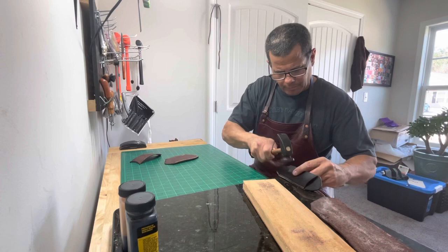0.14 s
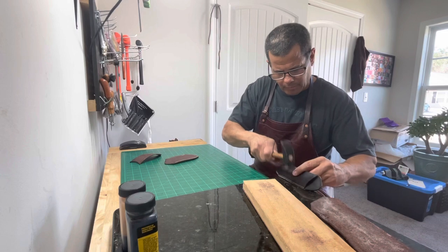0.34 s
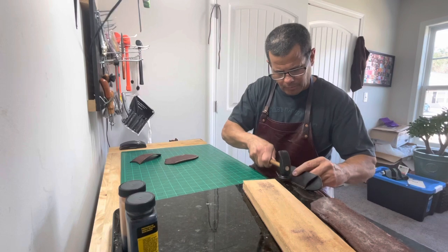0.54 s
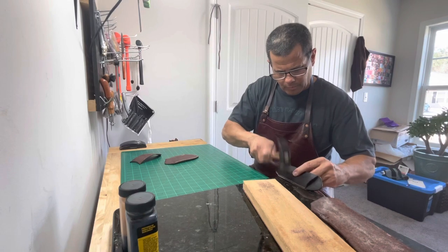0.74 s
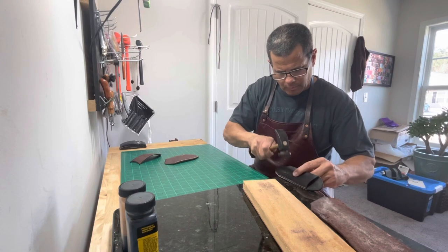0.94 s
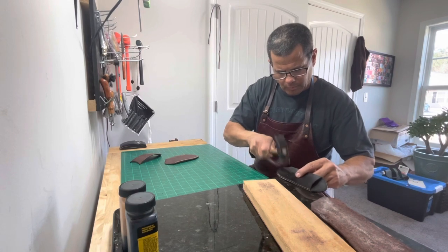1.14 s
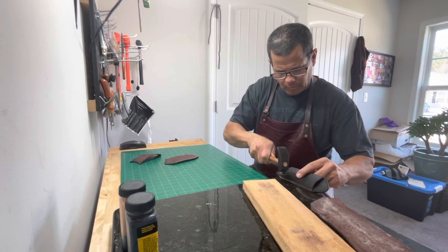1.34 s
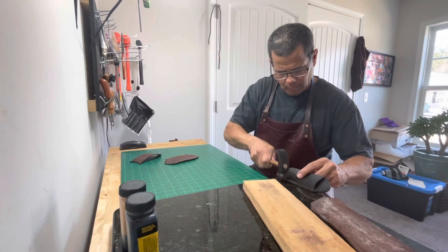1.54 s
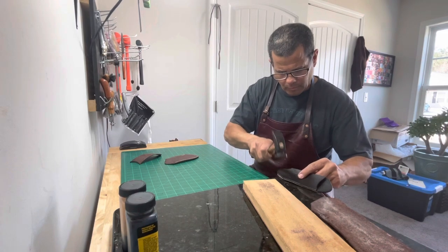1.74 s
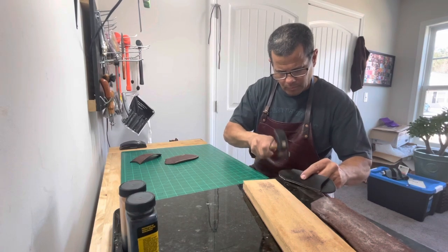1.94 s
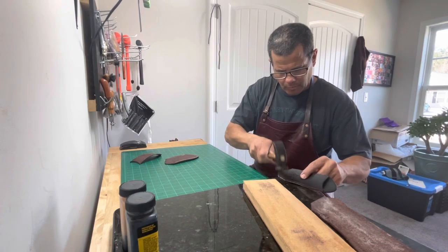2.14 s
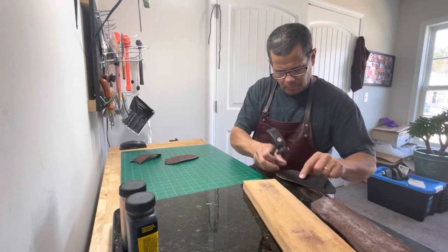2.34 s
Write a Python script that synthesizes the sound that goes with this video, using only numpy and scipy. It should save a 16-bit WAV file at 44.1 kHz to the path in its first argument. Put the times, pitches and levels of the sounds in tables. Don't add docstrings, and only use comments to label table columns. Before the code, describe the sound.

Steady hammer blows on leather over a stone slab, hard woody knocks with short room echo

```python
import sys
import numpy as np
from scipy import signal
from scipy.fft import rfft, irfft
from scipy.io import wavfile
from scipy.ndimage import uniform_filter1d, minimum_filter1d

SR = 44100
rng = np.random.default_rng(int(sys.argv[2]) if len(sys.argv) > 2 else 0)


def inscribe(sig):
    pcm = np.round(np.clip(np.atleast_2d(sig).T, -1, 1) * 32767)
    wavfile.write(sys.argv[1], SR, pcm.astype(np.int16))


def ratio(d):
    e = np.asarray(d, float) / 20
    return 10 ** e


N = 105840


def rms_one(x):
    return x / np.sqrt(np.mean(x ** 2) + 1e-20)


def at_hz(points, hz):
    p = np.array(points)
    return np.interp(np.log(np.maximum(hz, 1)), np.log(p[:, 0]), p[:, 1])


def train(s, gain):
    x = np.zeros(N)
    np.add.at(x, np.clip((np.asarray(s) * SR).astype(int), 0, N - 1), gain)
    return x


def ring(clicks, hz, t60):
    r, w = ratio(-60 / (max(t60, .003) * SR)), 2 * np.pi * hz / SR
    return signal.lfilter([0, np.sin(w)], [1, -2 * r * np.cos(w), r * r], clicks + 1e-18)


def coloured(white, spectrum):
    size = white.shape[-1]
    gain = ratio(at_hz(spectrum, np.arange(size // 2 + 1) * SR / size))
    return rms_one(irfft(rfft(white) * gain, size))


def band(x, low_high_hz):
    return signal.sosfilt(signal.butter(2, low_high_hz, "band", fs=SR, output="sos"), x)


# t/s, peak level/dB, crack level/dB, lead-in level/dB, echo brightness/dB
BLOWS = [
    (0.212, -7.5, -27.5, -23.5, -5),
    (0.493, -8, -24, -18, -4),
    (0.766, -8, -26, -13.5, -3.5),
    (1.026, -8, -26.5, -15, -4),
    (1.29, -7.5, -25, -26.5, 0),
    (1.538, -8.5, -27, -16, -3.5),
    (1.795, -8.5, -27, -16, 1),
    (2.051, -8, -29.5, -13.5, -0.5),
]
# f/Hz, left level/dB, right level/dB, t60/s, start lag/s
BENCH_MODES = [(112.2, -30.5, -37, 0.33, 0.0301), (143, -37, -50, 0.92, 0.04113),
               (183.5, -33, -36, 0.61, 0.0301), (262.8, -25, -31, 0.24, 0.02),
               (549, -31, -40.5, 0.086, 0.00552), (345.8, -19.5, -28.5, 0.35, .03),
               (425, -17.5, -23.5, 0.33, 0.012), (511.7, -18, -24, 0.17, 0.00418),
               (680, -24, -30, 0.16, 0.004), (756, -16.5, -29.5, 0.21, 0.00726),
               (800, -18, -31, 0.19, 0.0067), (884, -22.5, -36, 0.27, 0.0072),
               (955, -19, -33, 0.17, 0.00348), (1211, -23.5, -32, 0.088, 0.003026)]
RIGHT_SIGN = [1, 1, 1, 1, 1, 1, 1, 1, 1, -1, 1, -1, 1, 1]


def knock():
    spread_db, contact_hz = 1.49, 1660
    out, (s, db) = np.zeros((2, N)), np.transpose(BLOWS)[:2]
    spread = spread_db * rng.standard_normal((len(s), len(BENCH_MODES)))
    for k, (hz, left_db, right_db, t60, lag) in enumerate(BENCH_MODES):
        clicks = train(s + lag, ratio(db + 5 + spread[:, k]))
        out += ring(clicks, hz, t60) * [[ratio(left_db)], [RIGHT_SIGN[k] * ratio(right_db)]]
    return signal.lfilter(*signal.butter(2, contact_hz, fs=SR), out)


# f/Hz, level/dB, peak after blow t/s, half length/s
SLAP_LEFT = [(832, 1, 0.0024, 0.0014), (468.7, 2, 0.0075, 0.0039), (1170, -15.5, 0.00202, 0.0014),
             (2277, -30.5, 0.004, 0.0037), (3350, -25, 0.000972, 0.00093), (1170, -16, .012, 0.0023),
             (328.7, -6, 0.01529, 0.012), (678, -14, 0.002945, 0.0048), (150.3, -18, 0.02924, 0.011),
             (251, -16.5, 0.0103, 0.0068)]
# f/Hz, level/dB, peak after blow t/s, half length/s
SLAP_RIGHT = [(840, 1, 0.002656, 0.0032), (1202, -8.5, 0.002906, 0.0015), (866, -14.5, 0.014, 0.001),
              (2008, -28.5, 0.0025, 0.0031), (3380, -28.5, 0.00095, 0.0006),
              (1540, -24.5, 0.003074, 0.0047), (327.8, -8.5, 0.01544, 0.01), (510, -0.5, 0.0048, 0.0016),
              (148.4, -22.5, 0.03004, 0.012), (235, -18, 0.0061, 0.0071), (451, -9, 0.026, 0.0049),
              (150, -20, 0.00957, 0.0068)]
# f/Hz, level/dB, peak after blow t/s, half length/s
PUSH = [(78, -17.5, 0.0132, 0.0074)]


def slap():
    pitch_spread, push_left_db = .025, 4
    out, t = np.zeros((2, N)), np.arange(-500, 3500) / SR
    onset = np.clip(1 + t * 300, 0, 1) ** 2
    for s, db, crack_db, *_ in BLOWS:
        i, stray = int(s * SR), 1 + pitch_spread * rng.standard_normal(8)
        for side, rows in enumerate([SLAP_LEFT + PUSH, SLAP_RIGHT + PUSH]):
            for k, (hz, level_db, at, half) in enumerate(rows):
                level_db = level_db + (crack_db + 30.5 if hz > 1800 else db + 6)
                if hz < 100 and side == 0:
                    level_db += push_left_db
                pitch = hz * (stray[k % 8] if hz > 500 else 1)
                swell = onset * np.exp(-((t - at) / half) ** 2)
                wavelet = swell * np.cos(2 * np.pi * pitch * (t - at))
                out[side, i - 500:i + 3500] += ratio(level_db) * wavelet
    return out


# t/s, level/dB
BOUNCES = [(0.2182, -15.5), (0.4996, -38), (0.772, -19), (1.03, -21), (1.2961, -22.5), (1.5433, -15),
           (1.8005, -23), (2.0559, -22)]
BOUNCE_HZ = [2470, 1460]


def bounce():
    soft_hz, t60, right_db = 4000, 0.0038, -7.5
    s, db = np.transpose(BOUNCES)
    touch = signal.lfilter(*signal.butter(2, soft_hz, fs=SR), train(s, ratio(db)))
    return sum(ring(touch, hz, t60) for hz in BOUNCE_HZ) * ratio(np.array([[0], [right_db]]))


# f/Hz, level/dB per Hz
CRACK = [(760, -38), (1300, -1.5), (2600, -8.5), (4650, -27), (6820, -17.5), (8300, -30.5), (11000, -30),
         (16500, -43)]
# f/Hz, width/Hz, level/dB
LEAD = [(770, 60, 0.1), (1200, 120, -10), (2200, 200, -24), (3300, 250, -32), (5200, 350, -42),
        (6500, 350, -43), (7500, 300, -43)]


def crack():
    t60, rise_s, lag_s = 0.009, .0008, 0.00025
    level_db, pan_db, own_share = -2.5, 1, 0.51
    lead_s, lead_left_db, lead_stray = 0.023, -12, .06
    out, t = np.zeros((2, N + 4096)), np.arange(2048) / SR
    lag = int(lag_s * SR)
    snap_shape = ratio(-60 * t / t60) * (1 - np.exp(-(t / rise_s) ** 2))
    for s, _, crack_db, lead_db, bright_db in BLOWS:
        white, i = rng.standard_normal((4, 2048)), int(s * SR)
        spectrum = [(hz, db + bright_db * (hz > 4000)) for hz, db in CRACK]
        snap = coloured(white[0] + own_share * white[1:3], spectrum) * snap_shape
        snap = rms_one(snap) * ratio(crack_db + level_db)
        out[0, i + lag:i + lag + 2048] += snap[0] * ratio(pan_db)
        out[1, i:i + 2048] += snap[1] * ratio(-pan_db)
        for (hz, width_hz, db), (stray, swing) in zip(LEAD, rng.standard_normal((len(LEAD), 2))):
            if hz > 1000:
                hz, db = hz * (1 + lead_stray * stray), db + 3 * swing
            lead = rms_one(ring(ring(white[3], hz, 1.1 / width_hz), hz, 1.1 / width_hz))
            lead = lead * ratio(db + lead_db - 40 * t[::-1] / lead_s)
            out[:, i - 2048:i] += lead * [[ratio(lead_left_db if hz < 3000 else 0)], [1]]
    return out[:, :N]


# f/Hz, level/dB per Hz
ECHO = [(47, -45), (80, -20), (108, 5), (212, -2), (348, -1.5), (610, -7), (774, -2.5), (1070, -22.5),
        (14000, -71)]
# f/Hz, width/Hz, level/dB
ECHO_BODY = [(366, 29, 3.5), (434, 23, 2.5), (767, 20.4, 3), (616, 71, -6), (227, 82, -3), (145, 91, -0.5),
             (1120, 520, 4)]
# f/Hz, t60/s
ECHO_T60 = [(60, 0.4), (150, 0.5), (400, 0.36), (800, 0.28), (2000, 0.24), (5000, 0.18), (12000, 0.19)]
# f/Hz, correlation [-1 to 1]
LIKENESS = [(60, 0.89), (180, 1), (550, -0.6), (1650, -0.038), (4970, 0.12), (15000, -0.08)]
# f/Hz, left minus right level/dB
ECHO_LEFT = [(100, 5), (300, 1.5), (500, -0.5), (800, 4.5), (1500, 1.5), (4000, 3), (9000, 2.5),
             (14000, -5.5)]


def echo():
    level_db, new_share, top_hz = -25.5, 0.26, 12600
    late_db, late_tilt_db, late_longer = -6, 5.5, 2.75
    low_rise_s, rise_s, high_rise_s = 0.031, 0.0019, 0.0035
    size = 32768
    out = np.zeros((2, N + size))
    t, hz = np.arange(size) / SR, np.arange(size // 2 + 1) * SR / size
    colour = at_hz(ECHO, hz) + sum(db * np.exp(-((hz - c) / w) ** 2) for c, w, db in ECHO_BODY)
    colour = ratio(colour) / (1 + (hz / top_hz) ** 40)
    alike = np.clip(at_hz(LIKENESS, hz), -.98, .98)
    balance = ratio(at_hz(ECHO_LEFT, hz) / 2 * [[1], [-1]])

    centres = np.geomspace(40, 16000, 14)
    place = np.interp(np.log(hz + 1), np.log(centres), np.arange(14))
    fast = -60 * (t - .1) / at_hz(ECHO_T60, centres)[:, None]
    late = late_db + late_tilt_db * np.log2(centres / 1000)[:, None] + fast / late_longer
    rise = np.where(centres > 5000, high_rise_s, np.where(centres < 500, low_rise_s, rise_s))
    dying = (ratio(fast) + ratio(late)) * (1 - np.exp(-(t / rise[:, None]) ** 2))

    same = rng.standard_normal((2, size))
    for s, db, *_, bright_db in BLOWS:
        mid, side = rfft(same + new_share * rng.standard_normal((2, size))) * colour
        pair = np.sqrt(1 + alike) * mid + np.sqrt(1 - alike) * side * [[1], [-1]]
        pair = pair * balance
        norm = np.sqrt(np.mean(irfft(pair, size) ** 2))
        tail = np.zeros((2, size))
        for k, centre in enumerate(centres):
            part = irfft(pair * np.maximum(1 - abs(place - k), 0), size)
            bright = ratio(bright_db * np.clip(np.log2(centre / 1500) / 2, 0, 1))
            tail += part * dying[k] * bright
        i = int(s * SR)
        out[:, i:i + size] += tail / norm * ratio(db + level_db)
    return out[:, :N]


# start t/s, length/s, level/dB
RATTLES = [(0.653, 0.16, -67.5), (0.903, 0.14, -72.5), (1.385, 0.22, -85), (1.964, 0.032, -73),
           (2.307, 0.071, -84), (1.154, 0.16, -79), (1.648, 0.14, -81)]
TOOLS_HZ = [
    [2300, 8600, 3400, 4400, 10300, 6400, 11100],
    [1700, 3000, 3900, 4500, 2400, 1900, 1300],
    [4400, 3200, 4200, 2500, 3600, 2000, 1500],
    [6700, 8000, 6500, 6900, 6600, 2200, 1600],
    [2000, 2900, 3600, 4200, 1900, 2100, 1200],
    [1600, 2900, 3100, 4400, 1900, 2400, 1200],
    [1500, 2500, 3300, 4100, 1900, 2800, 1200],
]
# t/s, peak level/dB
TICKS = [(.622, -55), (1.7545, -53), (2.9, -50), (1.685, -63.5)]
TICK_BAND_HZ = [3800, 10500]


def rattles():
    touches_per_s, tool_t60, tilt_db = 600, .03, -7.5
    rustle_db, rustle_hz = 5.5, 1500
    out, t = np.zeros((2, N)), np.arange(N) / SR
    cloth = rms_one(band(rng.standard_normal((2, N)), [rustle_hz / 2, rustle_hz * 2]))
    for (s, length, db), tones in zip(RATTLES, TOOLS_HZ):
        on = np.clip(1 - (2 * (t - s) / length - 1) ** 2, 0, 1)
        out += ratio(db + rustle_db) * on * cloth
        for hz in tones:
            touches = rng.random((2, N)) < touches_per_s / SR
            clicks = touches * rng.standard_normal((2, N)) * on
            out += ratio(db + tilt_db * np.log2(hz / 4000)) * ring(clicks, hz, tool_t60)
    s, db = np.transpose(TICKS)
    burst = rng.standard_normal(90) * np.exp(-np.arange(90) / 25)
    ticks = np.convolve(train(s, ratio(db)), burst)[:N]
    return out + band(ticks, TICK_BAND_HZ)


# f/Hz, level/dB per Hz
HUM = [(15, -54.5), (25, -18), (54, -10.5), (75, -4.5), (142, -27.5), (501, -42), (833, -49), (1460, -52),
       (15000, -65.5)]


def hum():
    hum_db, line_db, line_hz = -61, -80, 68
    white = rng.standard_normal((4, N))
    line = rms_one(ring(white[3], line_hz, .4))
    rumble = coloured(white[0] + 0.49 * white[1:3], HUM)
    return ratio(hum_db) * rumble + ratio(line_db) * line


def scene():
    return knock() + slap() + bounce() + crack() + echo() + rattles() + hum()


def held_db(over, back_db_per_s):
    ramp = back_db_per_s * np.arange(N) / SR
    return np.maximum.accumulate(over + ramp, axis=-1) - ramp


def band_limit(x):
    return signal.sosfilt(signal.butter(12, 16640, fs=SR, output="sos"), x)


def record(dry):
    mic_top_hz, cutoff_hz = 13800, 16600
    duck_from_db, duck_share, duck_back_db_per_s = -51, 0.065, 72
    ceiling, release_db_per_s, look_s = .92, 400, .002
    dry = signal.sosfilt(signal.butter(3, mic_top_hz, fs=SR, output="sos"), dry)

    loud = 10 * np.log10(uniform_filter1d(np.mean(dry ** 2, axis=0), size=441) + 1e-12)
    duck = held_db(duck_share * np.maximum(loud - duck_from_db, 0), duck_back_db_per_s)
    dry = dry * ratio(2.5 - duck)

    over = np.maximum(20 * np.log10(np.abs(dry) / ceiling + 1e-9), 0)
    held = held_db(over, release_db_per_s)
    look = int(look_s * SR) | 1
    cut = uniform_filter1d(-minimum_filter1d(-held, 2 * look + 1, axis=1), look, axis=1)
    limited = dry * ratio(-cut)
    mix = signal.sosfilt(signal.cheby2(10, 50, cutoff_hz, fs=SR, output="sos"), limited)
    return band_limit(mix)


dry = scene()
out = record(dry)
inscribe(out)
```